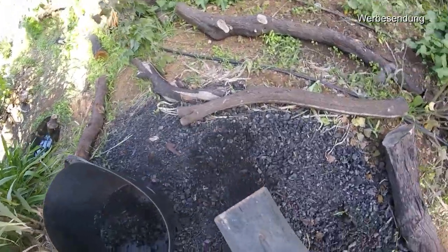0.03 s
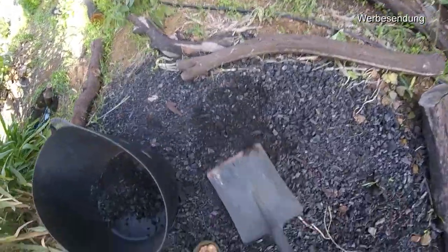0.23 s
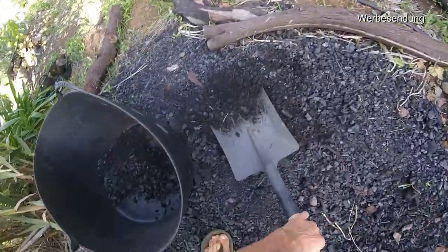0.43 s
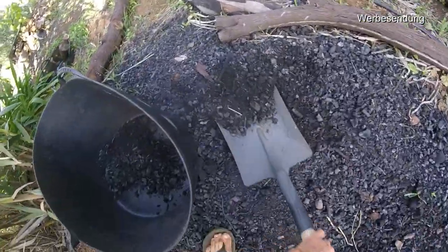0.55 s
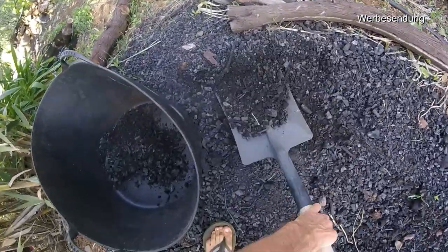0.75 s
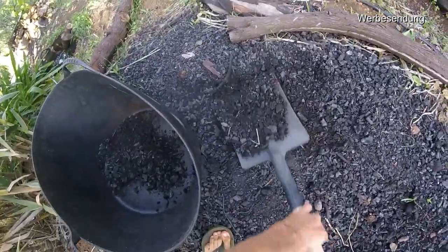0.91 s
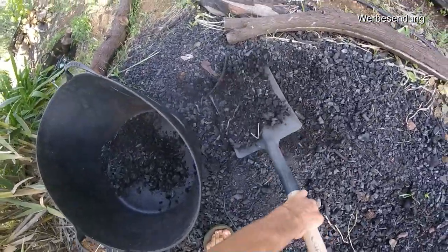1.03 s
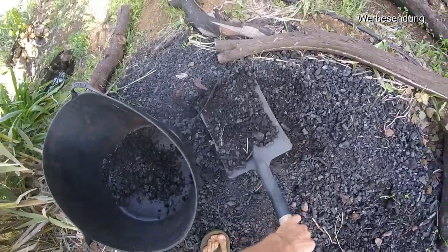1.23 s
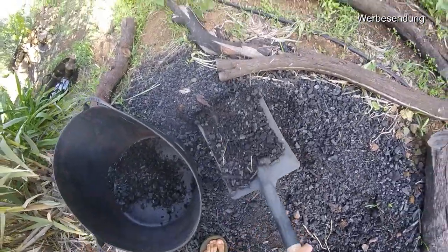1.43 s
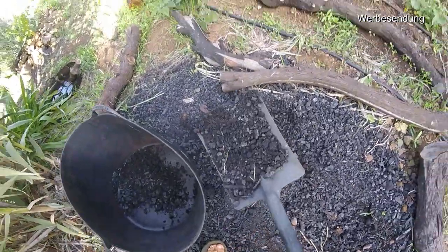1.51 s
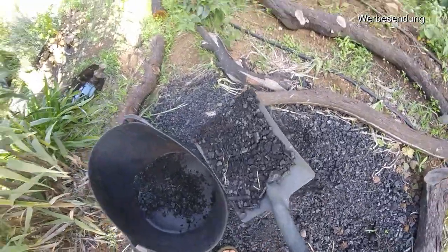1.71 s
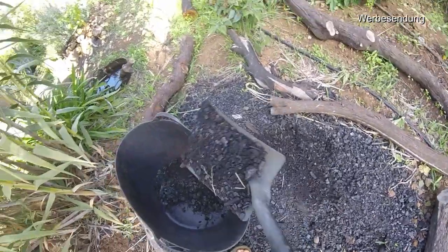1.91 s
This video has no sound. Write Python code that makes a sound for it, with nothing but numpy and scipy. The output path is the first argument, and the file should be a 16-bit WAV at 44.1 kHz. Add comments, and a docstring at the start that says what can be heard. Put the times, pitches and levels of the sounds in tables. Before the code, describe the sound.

Close up and outdoors, a metal shovel scrapes into a charcoal heap with a short ringing note, then grinds in twice more with snaps and dull thuds. A few pieces tick down afterward over a faint low rumble.

```python
"""Outdoors, close to a heap of charcoal, a steel shovel digs in with three pushes.
Lumps grind, snap and knock against the blade, which rings while bare and is muffled once buried.
In the first push the edge bites and the sliding steel sings one sagging note.
Loose pieces settle with small clinks over a quiet hiss, a faint far tone and a low rumble."""
import sys
import numpy as np
from scipy import signal
from scipy.fft import rfft, irfft
from scipy.io import wavfile
from scipy.ndimage import uniform_filter1d

SR = 44100
rng = np.random.default_rng(int(sys.argv[2]) if len(sys.argv) > 2 else 0)


def bounce(signal):
    """Save signal as a 16-bit WAV file at the path given by the first command-line argument."""
    frames = np.transpose(np.atleast_2d(signal))
    limited = np.clip(frames, -1, 1)
    pcm = np.round(limited * 32767).astype(np.int16)
    wavfile.write(sys.argv[1], SR, pcm)


N = 85995

# Grinding envelopes. Each row: time in seconds, crackle level in dB, low body level in dB.
FIRST_PUSH = [(0.184, -51, -42), (0.19, -30, -48), (0.205, -30, -25.5), (0.216, -22.5, -28),
              (0.245, -28.5, -40.5), (0.266, -33, -39.5), (0.294, -27.5, -34), (0.335, -23.5, -25.5),
              (0.395, -23, -28.5), (0.409, -22.5, -31.5), (0.421, -29, -22.5), (0.434, -33.5, -28.5),
              (0.471, -35.5, -31), (0.525, -44, -57), (0.591, -49, -53)]
SECOND_PUSH = [(0.617, -44.5, -95), (0.642, -46, -42), (0.669, -31.5, -38.5), (0.69, -20.5, -22.5),
               (0.721, -29, -34), (0.745, -29, -28), (0.755, -43, -46.5), (0.8, -48, -63),
               (0.824, -47, -44), (0.9, -50, -57.5)]
THIRD_PUSH = [(0.928, -44.5, -41.5), (0.951, -22.5, -27), (0.975, -26, -28), (1.008, -26.5, -26.5),
              (1.02, -31.5, -50), (1.042, -32, -33.5), (1.058, -39.5, -53), (1.148, -51, -65),
              (1.24, -55.5, -58.5), (1.329, -67, -88), (1.95, -93, -84)]
# Lumps snapping under the blade. Each row: start in seconds, level in dB, decay time in seconds.
LUMP_SNAPS = [(0.19, -34, 0.004), (0.2758, -23.5, 0.0088), (0.297, -30.5, 0.016), (0.3316, -21, 0.025),
              (0.4156, -12.5, 0.0057), (0.678, -28, 0.0037), (0.7047, -19, 0.012), (0.7183, -20, 0.011),
              (0.955, -24, 0.0084), (0.967, -23, 0.008), (1.006, -28, 0.0043)]
# Big lumps giving way. Each row: start in seconds, peak level in dB, pitch in Hz.
DULL_KNOCKS = [(0.687, -29.5, 250), (.69, -27, 409)]
# Loose pieces landing. Each row: start in seconds, level in dB, decay time in seconds, pitch in Hz.
LANDINGS = [(0.5437, -31, 0.0036, 3770), (0.6053, -41.5, 0.0052, 5800), (0.765, -39, 0.0084, 3200),
            (1.0894, -35.5, 0.0047, 5000), (1.095, -34, 0.0041, 3020), (1.111, -44, .004, 2700),
            (1.123, -32, 0.0059, 3200), (1.202, -39, 0.0026, 1820), (1.217, -41.5, 0.0039, 4560),
            (1.252, -39.5, 0.0041, 2970), (1.293, -49, 0.003, 2900), (1.4839, -35, 0.0043, 5000),
            (1.495, -38, 0.0006, 5700), (1.512, -46.5, 0.0016, 4630), (1.571, -41, 0.0038, 2960),
            (1.873, -50.5, 0.0074, 3520), (1.928, -42, 0.0017, 4630)]
# The steel blade's modes. Each row: pitch in Hz, undamped T60 in seconds, then relative level in dB
# when scraped, when struck on the edge and when hit on the face.
BLADE_MODES = [(418, 0.31, -10, -30, -1), (591, 0.34, -6.5, -9, -9.5), (987, 0.22, -9.5, -3.5, -13),
               (1563, 0.26, -7.5, -3.5, -9), (1763, 0.33, -3.5, -5.5, 0), (2302, 0.087, -2.5, -11, -10),
               (2796, 0.16, -3, 1, -3), (3264, 0.11, -17, -23, -2.5), (4850, 0.11, -11, -14, -9),
               (4930, 0.17, 0, -6, -1), (5045, 0.092, 1, -10, -7.5), (5560, 0.14, -3, -4, -16),
               (6015, 0.019, 2.5, -5, -3)]
SCRAPED, EDGE, FACE = np.array(BLADE_MODES).T[2:]
# The blade's main bending mode sags under load and springs back.
# Each row: time in seconds, pitch in Hz, level in dB.
BLADE_SONG = [(.19, 600, -44), (.225, 594, -29.5), (.3, 586, -32), (.34, 570, -30), (.395, 588, -37),
              (.422, 602, -26.5), (.455, 590, -48)]
# Low thuds of the heap giving way. Each row: centre in seconds, level in dB, half length in seconds.
HEAP_THUDS = [(0.462, -41.5, 0.064), (0.741, -34.5, 0.038), (0.983, -36, 0.076)]
# Tone curves for the crackle, the heap's body, single lumps, the air and the rumble.
# Each row: frequency in Hz, relative level in dB.
CRACKLE_EQ = [(600, -28), (1000, -4), (1380, -11), (1600, -1), (2100, -5), (3200, -3.5), (3900, -8),
              (5100, -2.5), (6300, -1), (7300, -11.5), (9300, -15), (12000, -26.5)]
BODY_EQ = [(40, -39.5), (100, -4), (190, -8.5), (280, -5), (600, 7), (850, 1), (1150, -1.5), (1500, -13.5),
           (3000, -59.5)]
LUMP_EQ = [(80, -3.5), (200, -8.5), (450, -3.5), (800, -10.5), (1350, -15.5), (1700, -5), (3200, -1.5),
           (3900, -10.5), (5100, 8), (6300, 1.5), (7400, -6), (10000, -16), (12500, -63)]
AIR_EQ = [(70, -10.5), (170, -21), (400, -22), (830, -26.5), (1100, -28.5), (2200, -30.5), (4300, -36.5),
          (5800, -32), (6550, -23.5), (7300, -30), (10300, -39.5), (12500, -39.5), (14500, -58)]
RUMBLE_EQ = [(20, -5), (40, -0.5), (58, -12), (85, -26), (130, -28), (300, -72)]

JUDDER_PER_S, JUDDER_DB = 92, 1.2  # the heap resists and yields by turns
BARE_DB, BARE_T60_SHARE = -3, 0.46
BURIED_DB, BURIED_T60_SHARE = -8, 0.41
HALF_BURIED_S, BURYING_S = 0.29, 0.11
DUST_DB, CRACKLE_DB, BODY_DB = -6.5, -5.5, -3.5
STRIKE_S, STRIKE_DB = .2135, 5.5
HUM_HZ, HUM_DB, HUM_FALL_DB_PER_S = 974, -59, 17.5
CHATTER_PER_S, KNOCK_T60_S = 9000, 0.12
PIECE_RING_DB, PIECE_Q = -5, 0.86
PIECE_LOW_HZ = 382  # small pieces radiate little below this
SHOVEL_HIGH_CUT_HZ = 11140  # a steep high cut takes the top off the shovel and charcoal sounds
SCATTER_DB, SCATTER_T60_S = -12.5, 0.12
AIR_DB, RUMBLE_DB = -56.5, -49.5
WHINE_HZ, WHINE_DB = 831, -73


def grinding(t):
    """Dense fractures crackle, lumps knock in the heap, and the scraping rings the blade."""
    when, crackle_db, body_db = np.array(FIRST_PUSH + SECOND_PUSH + THIRD_PUSH).T
    digging = t > when[0]
    effort = undb(np.interp(t, when, crackle_db) + JUDDER_DB * wobble(JUDDER_PER_S)) * digging
    weight = undb(np.interp(t, when, body_db)) * digging
    force = effort * clicks(per_s=4500, spread_db=2)
    dust = effort * undb(DUST_DB) * rng.standard_normal(N)
    buried = .5 + .5 * np.tanh((t - HALF_BURIED_S) / BURYING_S)
    bare_steel = undb(BARE_DB) * blade(force * (1 - buried), SCRAPED, BARE_T60_SHARE)
    buried_steel = undb(BURIED_DB) * blade(force * buried, SCRAPED, BURIED_T60_SHARE)
    body = colour(weight * clicks(per_s=1600, spread_db=3), BODY_EQ)
    crackle = colour(lumps(force) + dust, CRACKLE_EQ)
    return undb(CRACKLE_DB) * crackle + undb(BODY_DB) * body + bare_steel + buried_steel


def lumps(force, modes=40, ring_cycles=33):
    """Each contact rings a lump: its own random tenth of the modes, dying fast."""
    pitches = np.linspace(1600, 11000, modes) * (1 + .02 * rng.standard_normal(modes))
    rings = 0
    for hz in pitches:
        hits = force * rng.standard_normal(N) * (rng.random(N) < 1 / 10)
        rings += ring(hits, hz, ring_cycles / hz)
    return rings * np.sqrt(10 / modes)


def blade(force, levels_db, t60_share):
    """The steel's modes, weighted by where it is touched and shortened by the load lying on it."""
    steel = 0
    for (hz, t60, *_), db in zip(BLADE_MODES, levels_db):
        steel += undb(db) * unit(ring(force, hz, t60 * t60_share))
    return unit(steel) * np.std(force)


def snapping(t):
    """Large lumps break against the muffled steel."""
    force = sum(burst(t, *snap) for snap in LUMP_SNAPS)
    return colour(force, LUMP_EQ) + undb(-11) * blade(force, SCRAPED, BURIED_T60_SHARE)


def singing(t):
    """The edge bites, ringing the whole blade; sliding then sustains one sagging tone."""
    bite = signal.unit_impulse(N, int(STRIKE_S * SR))
    strike = undb(STRIKE_DB) * blade(bite, EDGE, t60_share=1)
    when, hz, db = np.array(BLADE_SONG).T
    sliding = (t > when[0]) & (t < when[-1])
    pitch = np.interp(t, when, hz) * (1 + 0.0052 * wobble(per_s=78))
    gain = undb(np.interp(t, when, db) + wobble(per_s=65)) * sliding
    return strike + gain * tone(np.cumsum(pitch) / SR)


def knocking(t):
    """Big lumps give way in the second push with low, quickly damped knocks."""
    knocks = 0
    for start, db, hz in DULL_KNOCKS:
        age = np.maximum(t - start, 0)
        envelope = undb(db) * np.exp(-np.log(1000) * age / KNOCK_T60_S)
        knocks += envelope * np.sin(2 * np.pi * hz * age)
    return knocks


def settling(t):
    """Loose pieces land, each with its own brief pitch, and clink on the loaded blade's face."""
    pieces, impacts = 0, 0
    for start, db, decay_s, hz in LANDINGS:
        force = burst(t, start, db, decay_s)
        t60 = np.log(1000) * PIECE_Q / (np.pi * hz)
        pieces += force + undb(PIECE_RING_DB) * ring(force, hz, t60)
        impacts += force
    low_cut = signal.butter(2, PIECE_LOW_HZ, "highpass", fs=SR, output="sos")
    ticks = colour(signal.sosfilt(low_cut, pieces), LUMP_EQ)
    return ticks + undb(-7) * blade(impacts, FACE, t60_share=0.22)


def humming(t):
    """The blade is still ringing as it comes down: one faint, fading tone."""
    return undb(HUM_DB - HUM_FALL_DB_PER_S * t) * tone(HUM_HZ * t)


def scatter(x):
    """The ground and nearby things throw back a short, diffuse tail after 4 ms."""
    lag, decay = fade(SCATTER_T60_S)
    reflections = decay * (lag > .004) * rng.standard_normal(N)[:len(lag)]
    return undb(SCATTER_DB) * through(x, reflections)


def background(t):
    """Quiet outdoor hiss, a faint far tone, and a rumble that swells as the heap gives way."""
    thuds = sum(undb(db) * np.exp(-((t - at) / width) ** 2) for at, db, width in HEAP_THUDS)
    rumble = colour(rng.standard_normal(N), RUMBLE_EQ)
    rumble /= np.sqrt(uniform_filter1d(rumble ** 2, size=4000))  # even out its own swells
    whine = undb(WHINE_DB) * tone(WHINE_HZ * t)
    hiss = undb(AIR_DB) * colour(rng.standard_normal(N), AIR_EQ)
    return (undb(RUMBLE_DB) + thuds) * rumble + whine + hiss


def clicks(per_s, spread_db):
    """Random contacts, many weak and a few strong, at a steady mean power."""
    strength = np.minimum(rng.exponential(size=N), 4)
    hits = (rng.random(N) < per_s / SR) * rng.choice([-1, 1], N) * undb(spread_db * strength)
    power = np.abs(uniform_filter1d(hits ** 2, size=700))
    return hits / np.sqrt(power + 1e-9)


def burst(t, start, db, decay_s):
    """A sharp contact and its quickly dying chatter."""
    age = t - start
    chatter = rng.choice([-1, 1], N) * rng.random(N) * (rng.random(N) < CHATTER_PER_S / SR)
    force = chatter * (age > 0) * np.exp(-np.abs(age) / decay_s)
    force[int(start * SR)] = .6  # the attack
    return force / np.linalg.norm(force) * undb(db) * np.sqrt(decay_s * SR / 2)


def ring(x, hz, t60):
    """One struck mode: a decaying sine."""
    t, decay = fade(t60)
    return through(x, decay * np.sin(2 * np.pi * hz * t))


def colour(x, curve, size=8192):
    """Minimum-phase EQ that follows a tone curve."""
    hz, db = np.array(curve, float).T
    grid = np.maximum(np.fft.rfftfreq(size, 1 / SR), 1)
    gain = undb(np.interp(np.log(grid), np.log(hz), db))
    cepstrum = irfft(np.log(gain))
    cepstrum[1:size // 2] *= 2  # fold forward, so nothing rings ahead of a hit
    cepstrum[size // 2 + 1:] = 0
    return through(x, irfft(np.exp(rfft(cepstrum))))


def through(x, response):
    """Pass a sound through a response scaled to unit energy."""
    return signal.fftconvolve(x, response / np.linalg.norm(response))[:N]


def fade(t60):
    """Times and gains of a decay by 60 dB."""
    t = np.arange(int(t60 * SR) + 2) / SR
    return t, np.exp(-np.log(1000) * t / t60)


def wobble(per_s):
    """Smooth random modulation at rms 1."""
    span = int(SR / per_s)
    return unit(uniform_filter1d(uniform_filter1d(rng.standard_normal(N), span), span))


def tone(cycles):
    """A sine at rms 1."""
    return np.sqrt(2) * np.sin(2 * np.pi * cycles)


def unit(x):
    """Scale to rms 1."""
    return x / np.sqrt(np.mean(x ** 2) + 1e-18)


def undb(db):
    """Decibels to gain."""
    return 10 ** (np.asarray(db) / 20)


def scene():
    """Shovel and charcoal up front, with a little scatter, over the outdoor bed in mono."""
    t = np.arange(N) / SR
    bed = background(t)
    shovel = grinding(t) + singing(t) + snapping(t) + settling(t) + knocking(t) + humming(t)
    shovel = signal.sosfilt(signal.butter(8, SHOVEL_HIGH_CUT_HZ, fs=SR, output="sos"), shovel)
    return (shovel + scatter(shovel) + bed)[None]


def record(dry):
    """A steep high cut at 14.7 kHz takes off the top."""
    return signal.sosfilt(signal.ellip(8, .2, 80, 14700, fs=SR, output="sos"), dry)


dry = scene()
out = record(dry)
bounce(out)
```